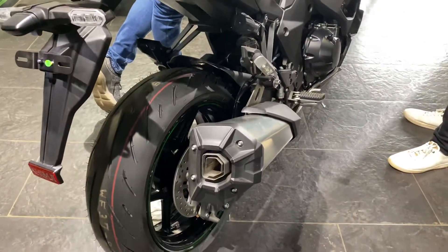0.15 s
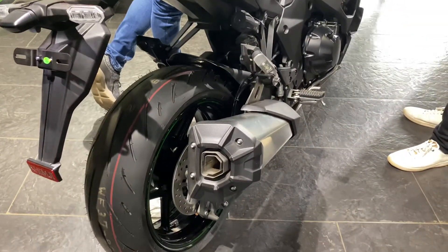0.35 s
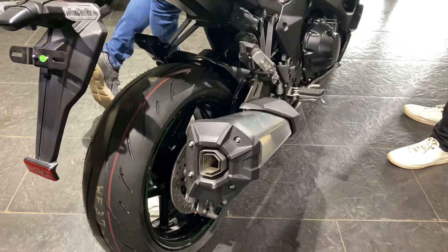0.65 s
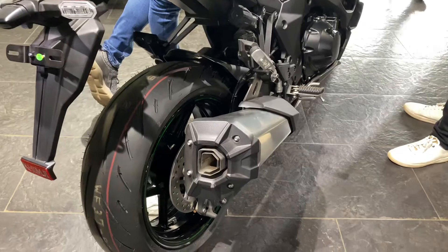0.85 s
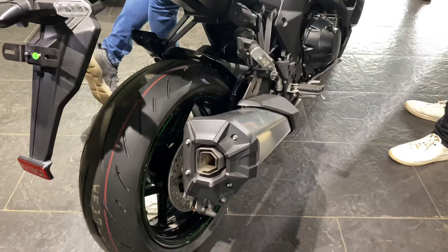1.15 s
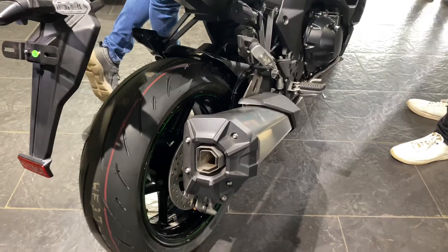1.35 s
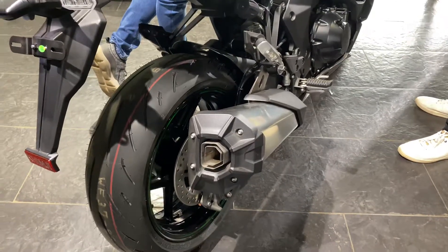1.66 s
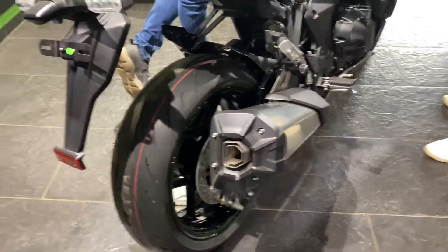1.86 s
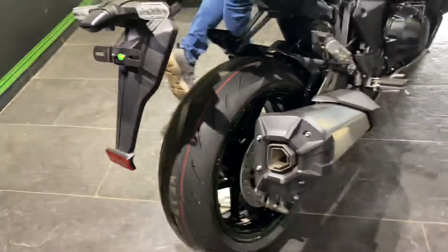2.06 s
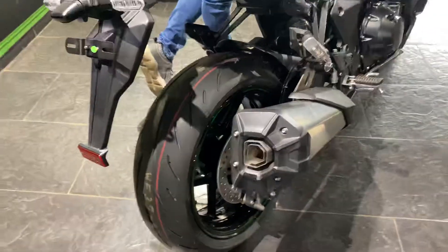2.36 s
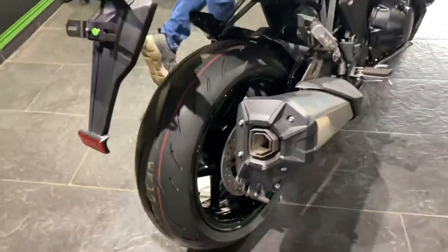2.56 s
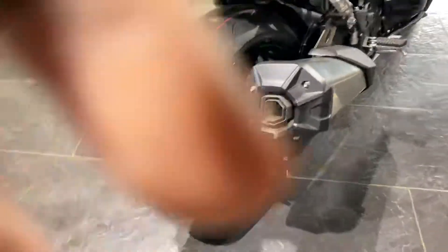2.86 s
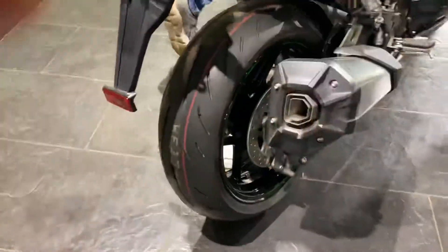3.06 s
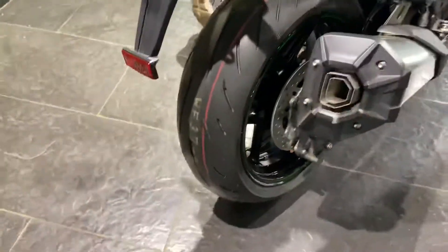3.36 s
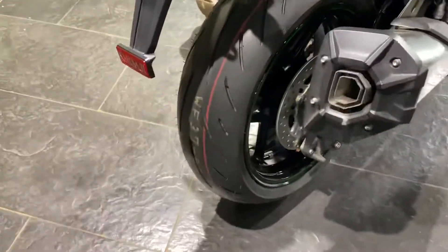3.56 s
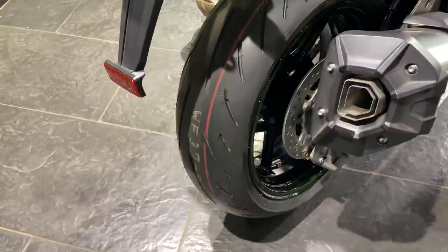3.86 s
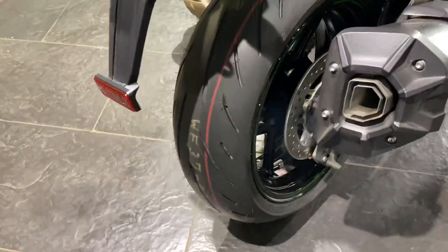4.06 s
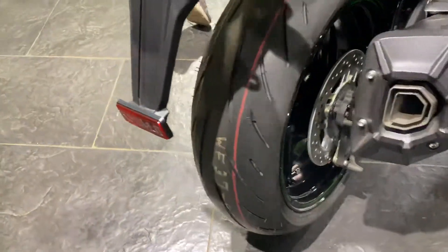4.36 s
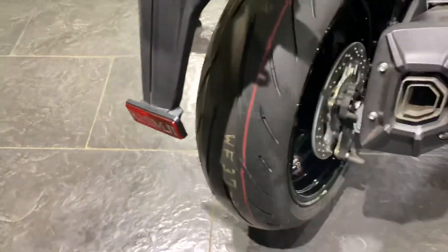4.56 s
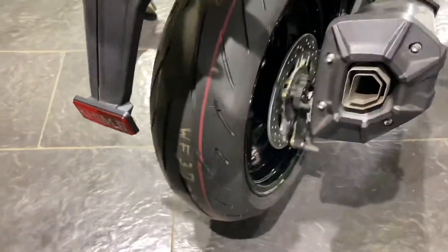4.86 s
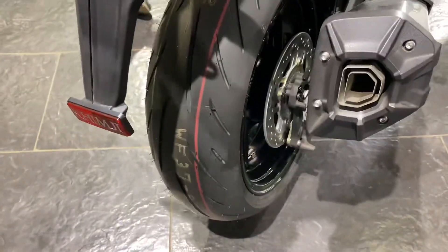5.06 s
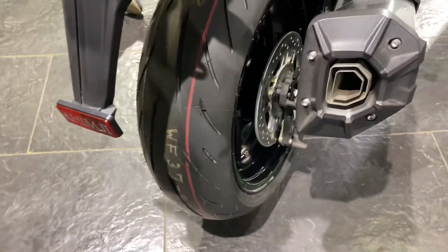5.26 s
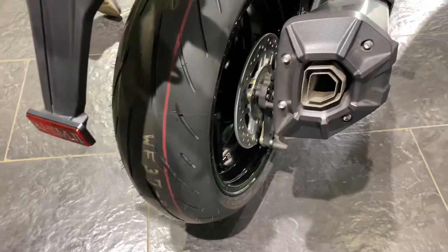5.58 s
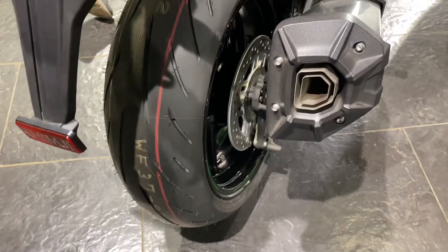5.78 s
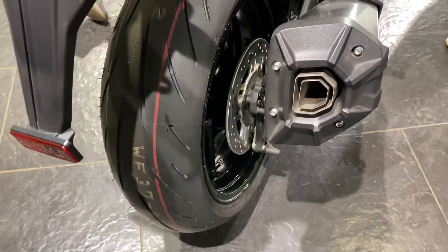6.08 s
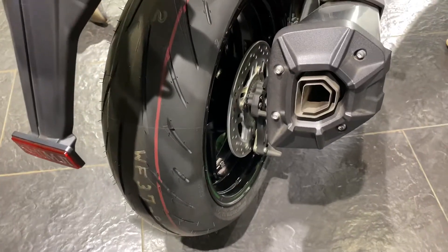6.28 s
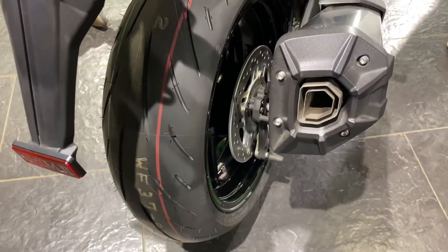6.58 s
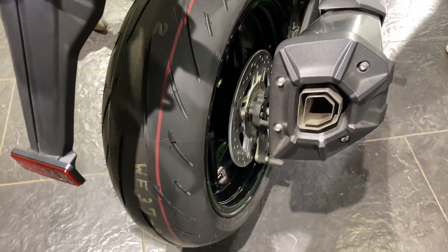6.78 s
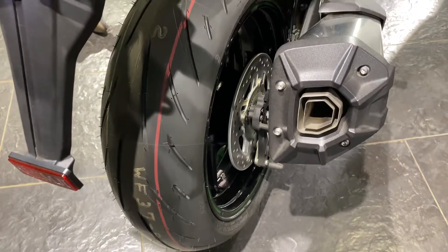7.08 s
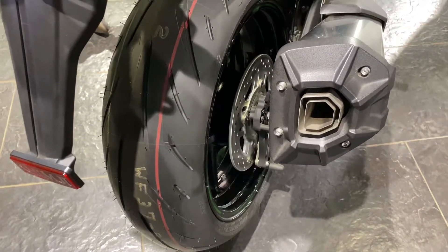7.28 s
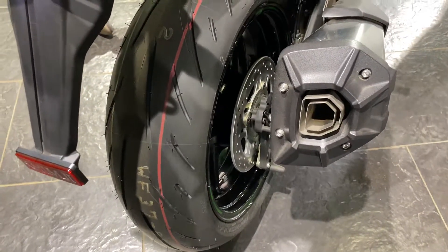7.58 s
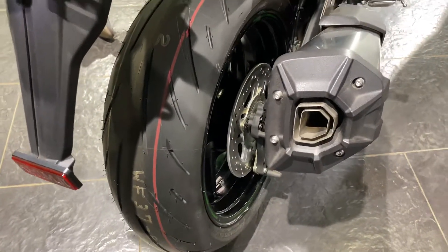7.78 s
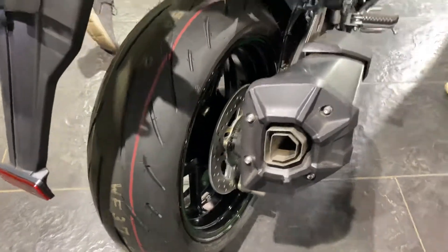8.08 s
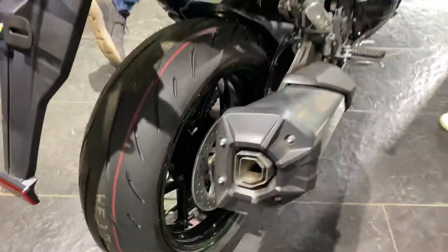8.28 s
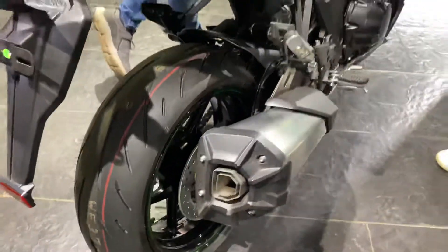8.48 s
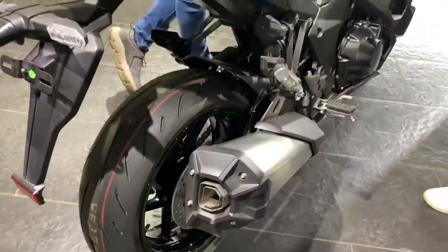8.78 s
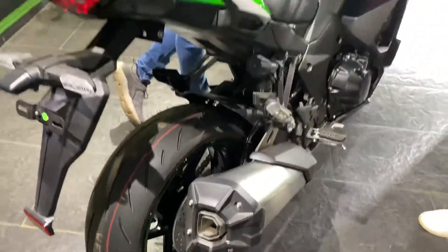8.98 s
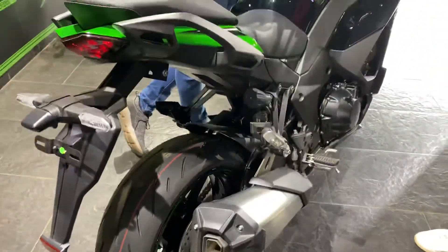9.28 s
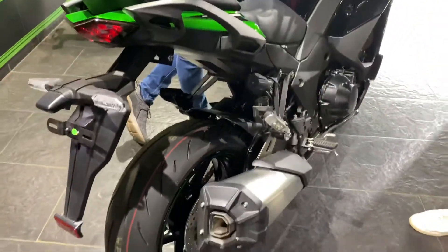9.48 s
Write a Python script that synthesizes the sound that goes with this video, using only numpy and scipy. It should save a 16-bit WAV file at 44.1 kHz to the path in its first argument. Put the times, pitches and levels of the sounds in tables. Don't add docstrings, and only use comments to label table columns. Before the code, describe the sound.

Close behind a motorcycle silencer in a hard-floored showroom: deep humming idle, one smooth rev up, quick fall, then even low idling.

```python
import sys
import numpy as np
from scipy import signal
from scipy.fft import rfft, irfft, next_fast_len
from scipy.io import wavfile
from scipy.ndimage import uniform_filter1d, map_coordinates

SR = 44100
rng = np.random.default_rng(int(sys.argv[2]) if len(sys.argv) > 2 else 0)


def waveform_to_disk(signal):
    frames = np.transpose(np.atleast_2d(signal))
    scaled = np.clip(frames, -1, 1) * 32767
    samples = np.round(scaled).astype(np.int16)
    wavfile.write(sys.argv[1], SR, samples)


def elevation(decibels):
    levels = np.asarray(decibels, float)
    return 10 ** (levels / 20)


N = 425124

# [f/Hz, t60/s]
REVERBERATION = [(60, 0.28), (300, 1), (2000, 0.096)]
# [f/Hz, width/Hz, level/dB]
STANDING_WAVES = [(112, 1.4, 5.5), (236, 3.9, 5)]
# [t/s, depth/dB]
FUNDAMENTAL_DIPS = [(2.594, 26), (2.707, 26), (2.803, 24), (2.879, 2), (3.0, 8), (3.103, 12), (3.142, 6),
                    (3.182, 19), (3.221, 15), (3.329, 34), (3.39, 7), (3.527, 12), (3.688, 24), (3.809, 16),
                    (3.859, 12), (3.973, 21), (4.086, 25), (4.143, 17), (4.252, 18), (4.32, 20), (4.37, 14),
                    (4.45, 10), (4.57, 20), (4.605, 15)]
ROOM_HZ = 150

# [f/Hz, correlation]
PORT_CORRELATION = [(60, .98), (300, .8), (600, .25), (1500, .3), (7500, .4), (8700, .4), (9600, .45),
                    (10200, 1), (16000, 1)]
# [f/Hz, half turns]
PORT_LEAD = [(300, 0), (900, .25), (1400, -.35), (2800, -.2), (3500, -.8), (4500, -1.7), (5500, -1),
             (6500, 0), (8300, 1), (9400, .8), (10500, 0), (11500, 0), (12600, -1), (14200, -1),
             (15400, -2)]
# [t/s, rasp level/dB, machinery L-R level/dB, exhaust L-R level/dB]
LISTENER_PATH = [(0, -23, 1.1, -1), (1.6, -23, 0, -1.6), (2.33, -22, 1.1, -2.5), (2.6, -21.5, 2, -3),
                 (2.95, -17.5, 4.5, -4), (3.4, -18.5, 5, -2.5), (3.75, -19, 5, 2.5), (4.0, -25.5, 4, -2.5),
                 (4.25, -30, 6.5, -3.5), (4.67, -36.5, 4, -4), (4.97, -30.5, 4, -4), (6.3, -31, 4, -3.5),
                 (7.4, -29.5, 3.5, -3.5), (8.4, -27.5, 3.5, -2), (9.64, -27.5, 3, -2.5)]

# [f/Hz, width/Hz, level/dB]
CASING_MODES = [(494, 34, -23), (801, 19, 4.5), (1452, 135, 2), (1642, 14, 5), (2174, 12, -2.5),
                (2336, 17, -8), (3064, 20, 4.5), (3400, 10, 6), (3770, 26, 6.5), (4510, 37, -18),
                (5730, 25, 11.5), (6580, 230, 1)]
# [f/Hz, width/Hz, level/dB]
SIDE_COVER_MODES = [(2162, 31, 7), (2354, 40, 8)]
# [f/Hz, width/Hz, level/dB]
INTAKE_MODE = [(1710, 400, -11)]
# [f/Hz, level/dB]
RASP_SPECTRUM = [(150, -7), (330, -5), (410, -3), (470, -8.5), (800, -5), (1240, -8.5), (1430, -7),
                 (2330, -6.5), (2770, -11.5), (4000, -17.5), (5200, -26), (8800, -120)]
# [f/Hz, level/dB]
HISS_SPECTRUM = [(2500, -51), (3300, -2.5), (4400, -3), (5300, -6.5), (7000, -10), (8500, -12),
                 (9600, -12.5), (10500, -13), (12000, -15), (14200, -20.5), (15500, -19), (15750, -30),
                 (15800, -92)]
# [f/Hz, level/dB]
ENGINE_COVER = [(1000, -4), (1850, -3), (2130, 5), (2300, -6), (3550, -7), (3850, 5), (4150, -2), (4900, 0),
                (5400, -13), (8000, -50)]
GEAR_RATIOS = [27, 40.6, 50]
GEAR_DB = [-13, -15.5, -18]
LOAD_DB, SLACK_DB = 5, 7
HISS_DB, HISS_TURN_DB, HISS_SPEED_DB = -10.5, -1.29, 2.5
SING_DB, SING_TURN_DB = -13, -3.2
ROAR_SPEED_DB = 12.5

# [t/s, firing rate f/Hz]
FIRING_RATE = [(0, 58.13), (.5, 58.4), (0.719, 61.9), (1.3, 63.17), (1.799, 67.46), (2.3, 80.93),
               (2.87, 104.9), (3.17, 133.3), (3.4, 169.2), (3.62, 227.9), (3.73, 238), (3.98, 149.2),
               (4.27, 92.8), (4.561, 58.1), (4.749, 49.8), (4.9, 51), (7.4, 52.07), (9.64, 53.3)]
HUNT, HUNT_PER_S = .006, 6
# [t/s, fundamental level/dB, closure 0-1]
THROTTLE = [(0, -19.5, 1), (.06, -11, 0.84), (.42, -14, 1), (.54, -9, 0), (1.2, -7, 0), (1.8, -10.5, 0.53),
            (1.93, -8.5, 0.03), (2.15, -13, 0.64), (2.42, -6.5, 0), (2.9, -10.5, 0), (3.65, -15, 0.18),
            (4.1, -17.5, 0.01), (4.3, -32, 0.05), (4.48, -20.5, 0.11), (4.64, -23.5, 0.97),
            (4.95, -21.5, 0.99), (7.9, -19, 1), (9.64, -19.5, 0.81)]
OPEN_DB = [-14, -17, -23]
SHUT_DB = [17, 10, 5]
OVERRUN_DB = [3, 16, 22]
OVERRUN_PER_S = 1.7
SHARPER_DB = 1.5
# [t/s, fundamental level/dB, second level/dB, third level/dB]
ORDER_SWELLS = [(.53, 0, 4.5, -6), (.62, 1, 10, 2), (.74, 0.5, 10, 0), (1.4, -4, 1, -4), (1.98, 0, 4.5, -9),
                (2.18, -1, -5.5, 12.5), (3.03, -3, -5, 1), (3.12, 2.5, -10, 4), (3.22, 1.5, 2, -4),
                (3.33, -1, 3.5, -4), (4.2, 1.5, -10, 0), (4.76, -6, -5.5, 0), (5.1, 1, -5, -4),
                (5.32, -3, -1.5, -3), (5.55, -2, -2, -5), (5.87, -1, 3, -1), (6.35, -1, -1, -1),
                (7.35, 1, -0.5, 1), (7.75, 1, -3, 0), (8.52, 0.5, -2, 4), (8.791, 2.5, -0.5, -24),
                (8.86, -4, 0.5, 4), (9.03, 0, -5.5, 5), (9.52, -6, -9, 5.5)]
ORDER_SWELL_S = 0.048
# [f/Hz, level/dB]
SILENCER_BOX = [(108, 2.5), (126, -6.5), (152, 2.5), (184, -8.5), (214, -3.5), (246, -6.5), (295, -1.5),
                (720, -6)]
# [f/Hz, width/Hz, level/dB]
CHAMBERS = [(65, 35.6, 2), (103.6, 34, 5), (205.94, 250, -14.5), (371, 55.2, -8.5)]
# [f/Hz, level/dB]
TAILPIPE = [(150, 3), (330, 0), (400, -8), (520, -2), (900, -2), (1300, -8), (3000, -40)]
BURBLE_DB = -32.5
# [t/s, spread/s, level/dB]
RAGGED_FIRING = [(0, .35, 11), (3.25, 0.16, 7), (4.1, 0.09, 10), (4.19, 0.055, 6.5), (4.3, .05, 10),
                 (4.47, 0.088, 7.5), (5.6, 0.47, 2)]


def unit(x):
    return x / np.sqrt(np.mean(x ** 2) + 1e-20)


def along(points, hz):
    f, v = np.transpose(points)
    return np.interp(np.log(hz + 1), np.log(f + 1), v)


def curves(rows):
    s, *cols = np.transpose(rows)
    return [np.interp(np.arange(N) / SR, s, c) for c in cols]


def bumps(rows):
    t = np.arange(0, N / SR + .01, .002)
    swells = sum(height * np.exp(-((t - s) / spread) ** 2) for s, spread, height in rows)
    return np.interp(np.arange(N) / SR, t, swells)


def wobble(rate):
    coarse = np.arange(0, N + 64, 64)
    knots = rng.standard_normal(int(N * rate / SR) + 4)
    return np.interp(np.arange(N), coarse, map_coordinates(knots, [coarse * rate / SR]))


def filtered(x, response):
    m = next_fast_len(N + SR // 2)
    return irfft(rfft(x, m) * response(np.fft.rfftfreq(m, 1 / SR)), m)[..., :N]


def resonances(modes, f):
    total = 0
    for k, (centre, width, db) in enumerate(modes):
        total = total + (-1) ** k * elevation(db) * 1j * f * width / (centre * centre - f * f + 1j * f * width)
    return total


def modal_power(modes, f):
    return sum(abs(resonances([mode], f)) ** 2 for mode in modes)


def panned(x, pan_db):
    return x * elevation([pan_db / 2, -pan_db / 2])


def pull(hz):
    slope = uniform_filter1d(np.gradient(np.log(hz)), size=4410) * SR
    return np.clip(slope / OVERRUN_PER_S, -1, 1)


def hall(x):
    _, t, z = signal.stft(rng.standard_normal((2, SR // 2)), SR, nperseg=1024)
    hz = np.linspace(0, SR / 2, z.shape[1])
    decay = elevation(-60 * t / along(REVERBERATION, hz)[:, None])
    tail = signal.istft(z * decay, SR, nperseg=1024)[1]
    delayed = np.pad(x, (600, 0))[None]
    return signal.fftconvolve(delayed, tail / np.linalg.norm(tail[0]), axes=1)[:, :N]


def rush(patchy_db):
    z = signal.stft(rng.standard_normal((2, N + 512)), nperseg=512)[2]
    field = uniform_filter1d(rng.standard_normal(z.shape[1:]), 4, 0)
    field = uniform_filter1d(field, 14, 1)
    pair = signal.istft(z * elevation(patchy_db * unit(field)), nperseg=512)[1][:, :N]

    def mid_side(hz):
        angle = np.arccos(along(PORT_CORRELATION, hz)) / 2
        return np.array([np.cos(angle), np.sin(angle)])

    mid, side = filtered(pair, mid_side)
    lead = lambda hz: np.exp(np.array([[.5j], [-.5j]]) * np.pi * along(PORT_LEAD, hz))
    return filtered(np.array([mid + side, mid - side]), lead)


def gears(hz, turns):
    def whine(k):
        level = elevation(along(ENGINE_COVER, k * hz) + 3.5 * wobble(9))
        drift = np.cumsum(.009 * hz * hz * wobble(200)) / SR * 2 * np.pi
        return level * np.cos(k * 2 * np.pi * turns + drift)

    effort = pull(hz)
    load_db = np.where(effort > 0, LOAD_DB, SLACK_DB) * effort
    return sum(elevation(db + load_db) * np.array([whine(k), whine(k)]) for k, db in zip(GEAR_RATIOS, GEAR_DB))


def side_cover(air, pan_db):
    sung = unit(filtered(air, lambda f: modal_power(SIDE_COVER_MODES, f)))
    return elevation(SING_DB + SING_TURN_DB * pan_db + 2.4 * wobble(7)) * sung


def intake(air, hz):
    level = elevation(INTAKE_MODE[0][2] + ROAR_SPEED_DB * np.log2(hz / hz.max()))
    return level * unit(filtered(air, lambda f: modal_power(INTAKE_MODE, f)))


def machinery(hz, turns):
    rasp_db, pan_db, _ = curves(LISTENER_PATH)
    beat = np.cos(2 * np.pi * turns - .9)
    air = filtered(rush(patchy_db=1.25), lambda f: np.sqrt(1 + modal_power(CASING_MODES, f)))

    rasp = unit(filtered(air, lambda f: elevation(along(RASP_SPECTRUM, f))))
    rasp = rasp + gears(hz, turns) + side_cover(air, pan_db) + intake(air, hz)
    rasp = rasp * elevation(rasp_db + .9 * beat)

    hiss_db = rasp_db + HISS_DB + HISS_TURN_DB * pan_db + HISS_SPEED_DB * np.log2(hz / hz[0])
    hiss = unit(filtered(air, lambda f: elevation(along(HISS_SPECTRUM, f))))
    hiss = hiss * elevation(hiss_db + .5 * beat + 0.12 * wobble(12))
    shaded = filtered(hiss, lambda f: 1 / (1 + (f / 6800) ** 12))
    return panned(rasp + shaded, pan_db) + hiss - shaded


def burble(turns, level_db):
    fired = np.flatnonzero(np.diff(np.floor(turns)))
    thumps = np.zeros(N)
    strength = np.tanh(rng.standard_normal(len(fired)))
    thumps[fired] = strength / np.sqrt(np.gradient(turns)[fired])
    steep = lambda f: 1 / (1 + (34 / (f + 1)) ** 3) / (1 + (f / 430) ** 10)
    return elevation(level_db) * unit(filtered(thumps, lambda f: resonances(CHAMBERS, f) * steep(f)))


def dipped(width):
    gain, t = np.ones(N), np.arange(N) / SR
    for s, depth_db in FUNDAMENTAL_DIPS:
        near = slice(int((s - .1) * SR), int((s + .1) * SR))
        dip = np.exp(-((t[near] - s) / width) ** 2)
        gain[near] *= np.sqrt(1 - (1 - elevation(-depth_db) ** 2) * dip)
    return gain


def orders(hz):
    one_db, shut = curves(THROTTLE)
    coast = np.clip(-pull(hz), 0, 1)
    weak = [bumps([(row[0], ORDER_SWELL_S, row[k]) for row in ORDER_SWELLS]) for k in range(1, 4)]
    steps = zip(OPEN_DB, SHUT_DB, OVERRUN_DB)
    two_db, three_db, upper_db = [one_db + o + s * shut - c * coast for o, s, c in steps]
    two_db = two_db + along(SILENCER_BOX, 2 * hz) + weak[1]
    three_db = three_db + along(SILENCER_BOX, 3 * hz) + weak[2]
    return one_db + weak[0], two_db, three_db, upper_db + SHARPER_DB * np.log2(hz / hz[0])


def note(hz, turns, one_db, two_db, three_db, upper_db):
    sweep = np.clip(hz - 70, 0, 80) / 80
    load = np.clip(hz - 54, 0, 5) / 5

    def order(k, blur=.05):
        phase = k * 2 * np.pi * turns - 0.54 * (k - 1) + blur * (k - 1) * wobble(14)
        return np.sqrt(2) * np.cos(phase)

    def broken():
        return elevation((0.5 + 2 * sweep) * wobble(9) + 3.44 * sweep * wobble(30.06))

    def piped(k, extra_db, blur):
        return elevation(along(TAILPIPE, k * hz) + extra_db) * broken() * order(k, blur)

    first = elevation(one_db + 1.6 * sweep * wobble(35)) * dipped(width=0.02) * order(0.99)
    second = elevation(two_db) * broken() * order(2)
    third = elevation(three_db) * broken() * order(3)
    upper = sum(piped(k, (1 + load) * wobble(5), .05 + .2 * sweep) for k in range(4, 7))
    fuzzy = sum(piped(k, -14 + 6 * load + 3 * sweep + 3 * wobble(6), .27) for k in range(7, 11))
    halves = sum(piped(k, 0, .2) for k in np.arange(3.5, 7))
    return first + second - third - elevation(upper_db) * (upper + fuzzy - elevation(-19 + .085 * hz) * halves)


def scene():
    s, firing = np.transpose(FIRING_RATE)
    log_speed = np.interp(np.arange(N) / SR, s, np.log(firing))
    speed = np.exp(uniform_filter1d(log_speed, size=2600))
    hz = speed * (1 + HUNT * wobble(HUNT_PER_S))
    turns = np.cumsum(hz) / SR
    exhaust = note(hz, turns, *orders(speed)) + burble(turns, BURBLE_DB + bumps(RAGGED_FIRING))
    room = elevation(-14) * hall(filtered(exhaust, lambda f: f * f / (f * f + ROOM_HZ ** 2)))
    exhaust = exhaust + filtered(exhaust * (hz > 70), lambda f: resonances(STANDING_WAVES, f))
    return panned(exhaust, curves(LISTENER_PATH)[2]) + room + machinery(speed, turns)


def top_cut(x):
    return signal.sosfilt(signal.butter(12, 17090, fs=SR, output="sos"), x)


def record(dry):
    soft = dry / (1 + np.abs(dry / .97) ** 8) ** (1 / 8)
    band = lambda f: (f < 15750) / np.sqrt(1 + (18 / (f + 1)) ** 4)
    return top_cut(filtered(soft, band))


dry = scene()
out = record(dry)
waveform_to_disk(out)
```